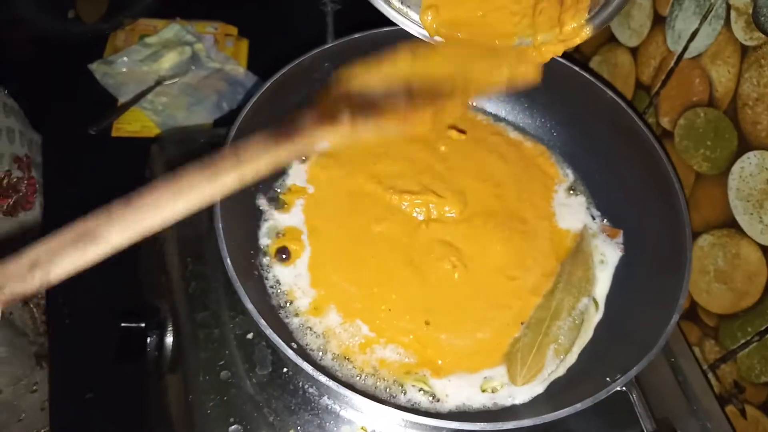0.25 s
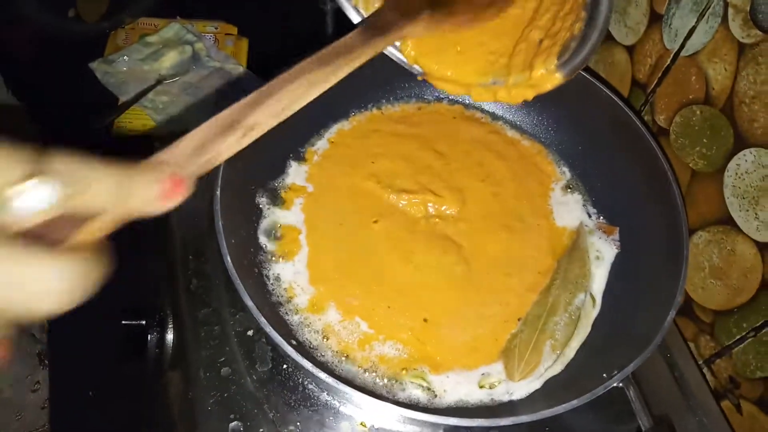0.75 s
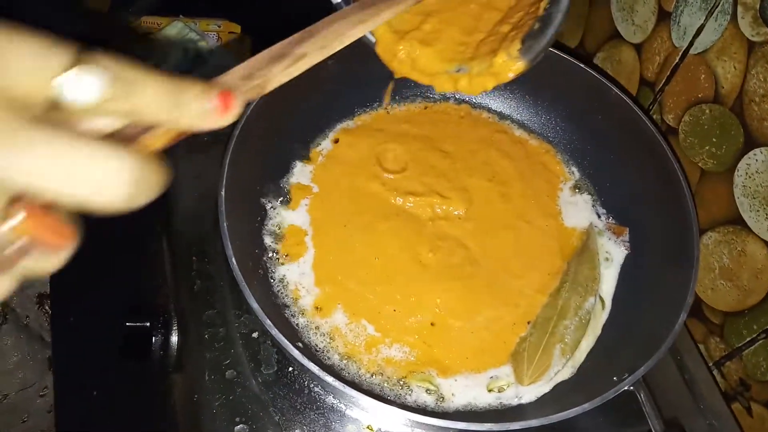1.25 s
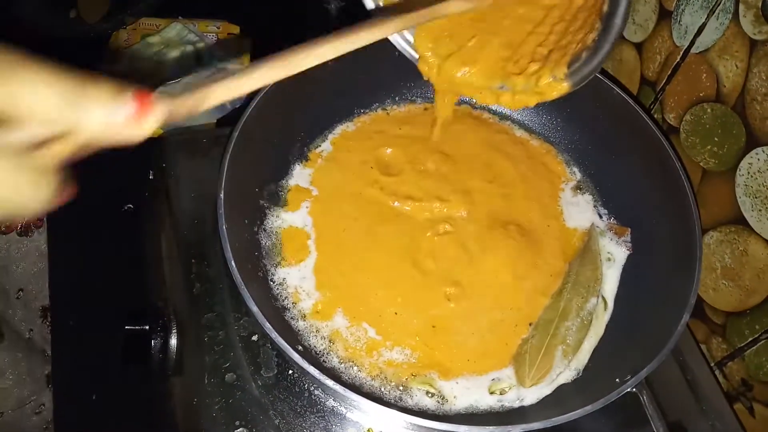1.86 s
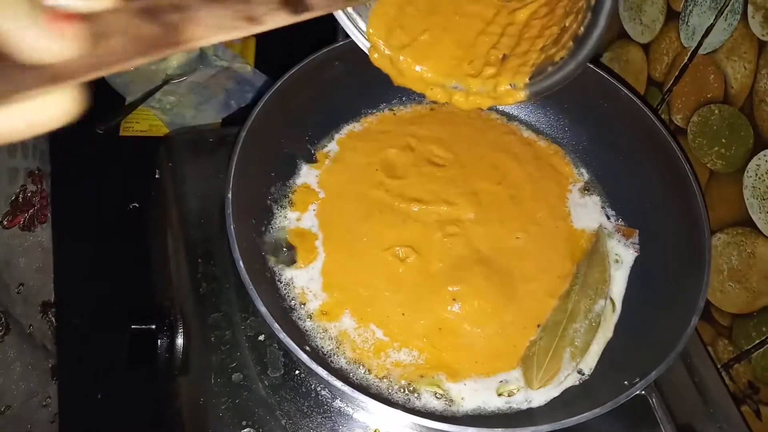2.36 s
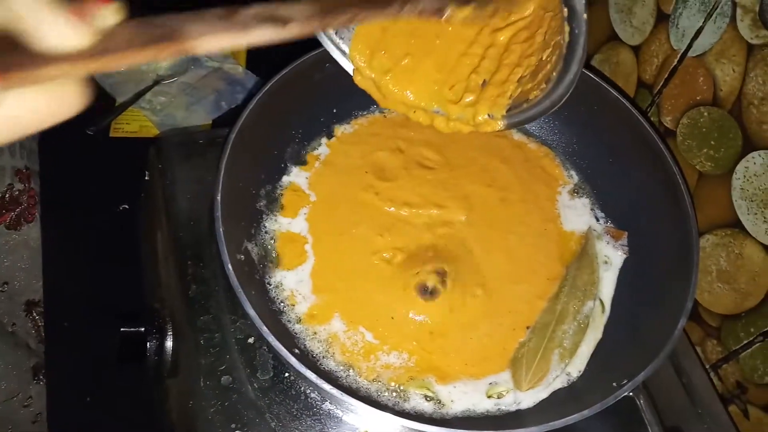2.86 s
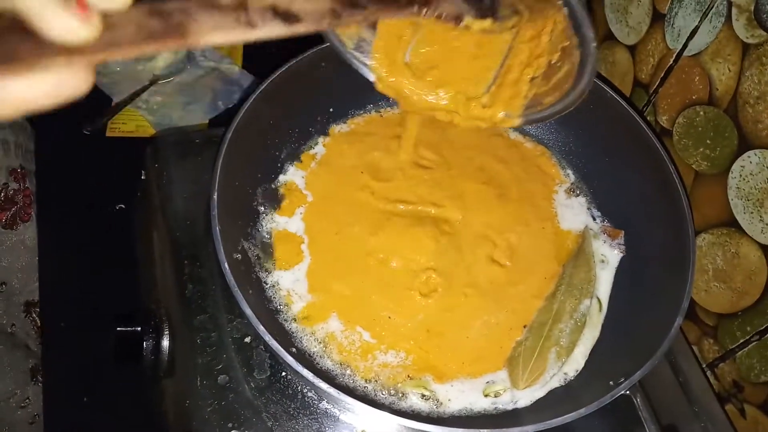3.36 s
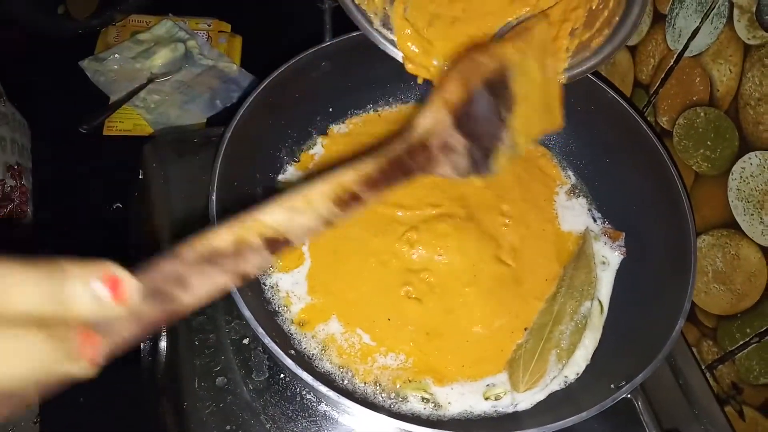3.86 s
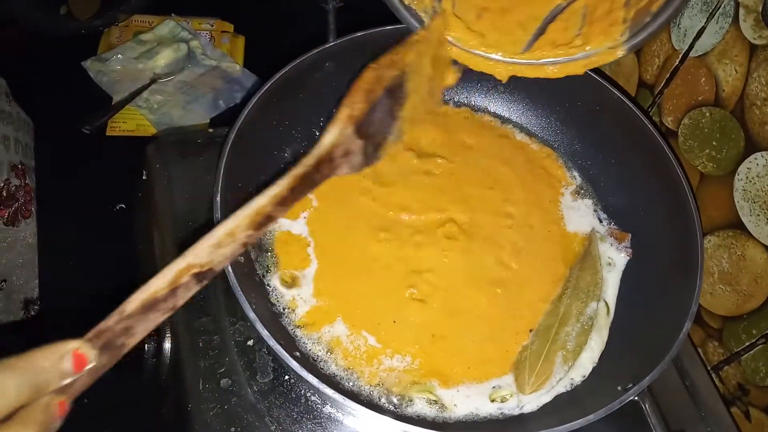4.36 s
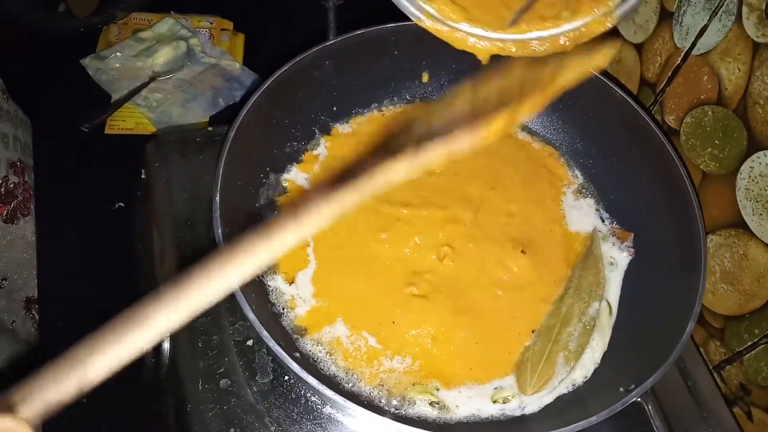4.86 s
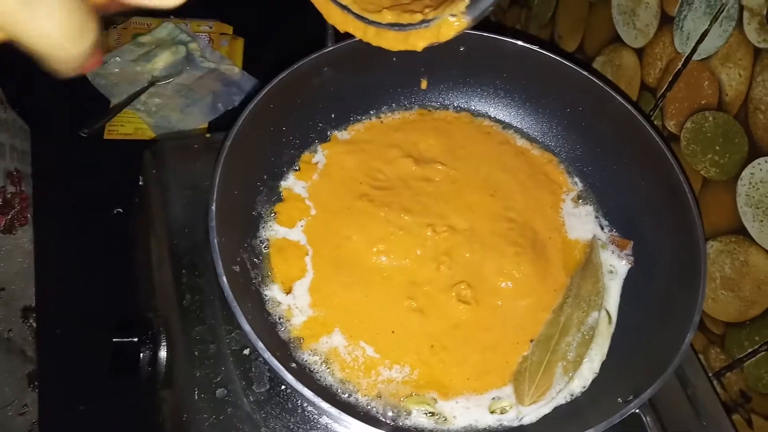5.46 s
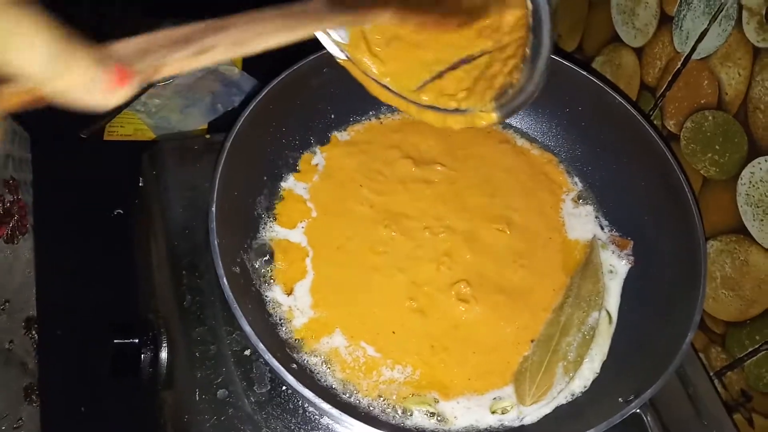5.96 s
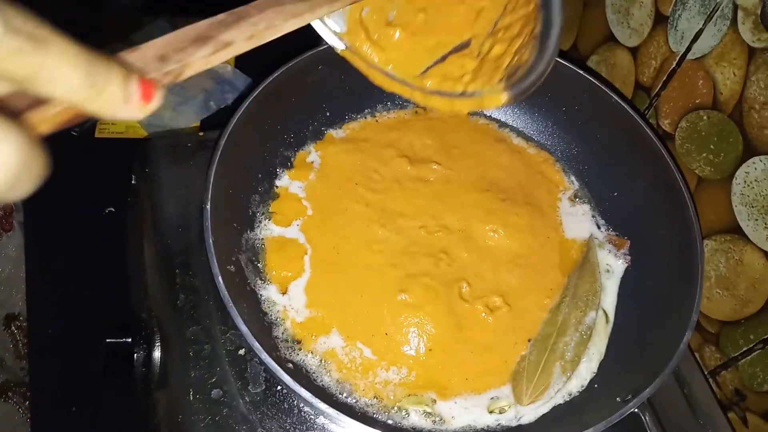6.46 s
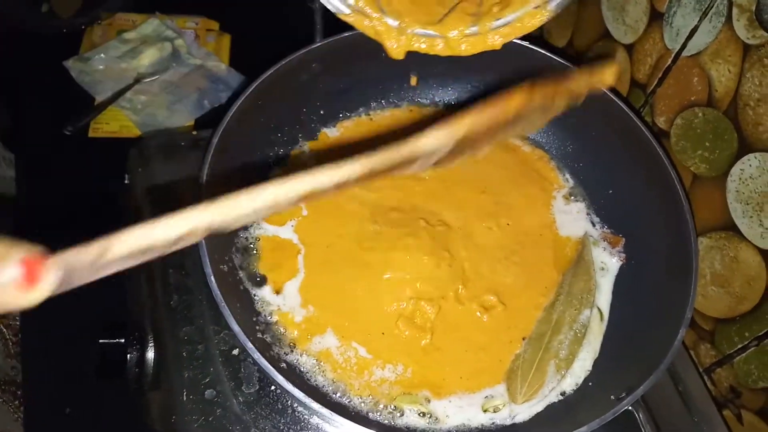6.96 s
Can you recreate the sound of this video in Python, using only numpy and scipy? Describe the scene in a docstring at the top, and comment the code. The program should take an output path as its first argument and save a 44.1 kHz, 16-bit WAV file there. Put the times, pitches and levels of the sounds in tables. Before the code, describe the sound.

Close to the pan in a small hard-walled kitchen, butter foam hisses and crackles throughout, flaring briefly. Thick paste seethes underneath with soft plops and puffs of steam, busiest around two seconds. Sharp droplets spit. A wooden spatula knocks a paste-deadened steel bowl near 0.7, 1.3, 3.9, 6.4 and 7.1 seconds, with two dull thuds between. A low hum swells occasionally and faint cricket-like chirps sound far off.

```python
"""Butter sizzles in a hot pan, close to a phone in a small kitchen: a hiss of dense impulses with pings and snaps.
Through it a thick paste seethes: gliding decaying tones make its bubbles, swept noise its puffs of steam.
A low hum of two wavering tones booms now and then; far off a train of short pulses chirps like a cricket.
Droplets spit as band-limited bursts; a wooden spatula knocks and rubs on a steel bowl deadened by paste, heard
as damped modes, with two low dull thuds. Hard walls reverberate; a scattered copy of opposite sign left and
right widens the sound."""
import sys
import numpy as np
from scipy import signal
from scipy.fft import rfft, irfft
from scipy.io import wavfile
from scipy.ndimage import uniform_filter1d

SR = 44100
rng = np.random.default_rng(int(sys.argv[2]) if len(sys.argv) > 2 else 0)


def file_out(sig):
    """Save sig as 16-bit WAV at sys.argv[1]."""
    # one column per channel
    cols = np.atleast_2d(sig).T
    # limit, then scale
    lim = np.clip(cols, -1, 1)
    pcm = np.round(lim * 32767).astype(np.int16)
    wavfile.write(sys.argv[1], SR, pcm)


N = 317520
TIME = np.arange(N) / SR


def amp(db):
    """Level law: decibels to amplitude ratio."""
    return 10 ** (np.asarray(db) / 20)


def unit(x):
    """Normalisation to an rms of 1."""
    return x / np.sqrt(np.mean(x ** 2) + 1e-18)


def peak(x, db):
    """Normalisation to a peak level in dB."""
    return x * amp(db) / (np.abs(x).max() + 1e-12)


def curves(table):
    """Linear interpolation of a timed table's columns, sample by sample."""
    times, *columns = np.transpose(table)
    return [np.interp(TIME, times, column) for column in columns]


def span(seconds):
    """Time axis [s] of a short sound."""
    return np.arange(int(seconds * SR) + 2) / SR


def fade(t, t60):
    """Exponential decay, falling by 60 dB in t60 seconds."""
    return np.exp(-np.log(1000) * t / t60)


def arch(middle_s, length):
    """Raised-cosine envelope: a smooth rise from 0 to 1 and back."""
    return np.cos(np.pi * np.clip((TIME - middle_s) / length, -.5, .5)) ** 2


def add(out, s, x):
    """Superposition: mix a short sound in at time s."""
    i = int(np.clip(s * SR, 0, N - 1))
    out[i:i + len(x)] += x[:N - i]


def band(x, lo_hz, hi_hz, order=2):
    """Causal Butterworth band-pass."""
    edges = [lo_hz, min(hi_hz, SR / 2 - 1000)]
    return signal.sosfilt(signal.butter(order, edges, "band", fs=SR, output="sos"), x)


def around(x, hz, octaves, order=2):
    """Band-pass of constant relative width, so many octaves around a pitch."""
    half = 2 ** (octaves / 2)
    return band(x, hz / half, hz * half, order=order)


def colour(x, points, size=2048):
    """Minimum-phase filter through (frequency [Hz], gain [dB]) points, so clicks stay sharp."""
    hz, db = np.transpose(points)
    bins_hz = np.arange(size + 1) * SR / size / 2
    gain_db = np.interp(np.log(bins_hz + 1), np.log(hz), db)
    # folding the cepstrum onto positive times gives the minimum phase
    cepstrum = irfft(np.log(amp(gain_db)))
    cepstrum[1:size] *= 2
    cepstrum[size + 1:] = 0
    response = irfft(np.exp(rfft(cepstrum)))
    return signal.fftconvolve(x, response)[:len(x)]


def walk(rate):
    """Smoothed random wandering with spread 1: new values at a rate per second, averaged twice."""
    k = int(SR / rate)
    steps = np.repeat(rng.standard_normal(N // k + 1), k)
    return unit(uniform_filter1d(uniform_filter1d(steps, k), k)[:N])


def clicks(rate, spread_db, cap_db):
    """Poisson-like impulses of either sign, at a rate per second: many small ones, a few large."""
    size = amp(np.minimum(spread_db * rng.exponential(size=N), cap_db))
    return (rng.random(N) < rate / SR) * size * np.sign(rng.standard_normal(N))


def patches(rate, swell_db, patch_db, smooth_db, edges):
    """Shot noise of dense tiny bursts, whose bands of pitch swell together and on their own."""
    out, swell = 0, swell_db * walk(50)
    ticks = unit(clicks(rate=rate, spread_db=2.0, cap_db=8.5)) + amp(smooth_db) * rng.standard_normal(N)
    for k, (lo, hi) in enumerate(zip(edges, edges[1:])):
        shifted = np.roll(ticks, k * N // len(edges))  # so the bands do not tick in step
        out = out + band(shifted, lo, hi, order=3) * amp(swell + patch_db * walk(60))
    return unit(out)


# butter foam frying a little harder as it heats, before the trim: (time [s], level [dB])
FOAM_HEAT = [(0.0, -45), (0.36, -46.5), (1.98, -45.5), (2.4, -43), (3.95, -44.5), (4.53, -46.5),
             (6.82, -42.5), (7.2, -42)]
# flare-ups where wet paste touches the fat: (middle time [s], rise [dB], length [s])
FLARE_UPS = [(0.657, 8.5, 0.16), (1.432, 7.5, 0.18), (1.95, 8, 0.058), (2.685, 7.5, 0.062),
             (3.473, 5.5, 0.073), (3.706, 4, 0.15), (6.104, 5, 0.048), (6.244, 3, 0.071)]


def frying(foam_db=3, unrest_db=-0.5, unrest_hz=16):
    """Level modulation of the foam [dB]: slow course of the heat, restless flutter and flare-ups."""
    (heat_db,) = curves(FOAM_HEAT)
    flares_db = sum(db * arch(s, length) for s, db, length in FLARE_UPS)
    return heat_db + foam_db + unrest_db * walk(unrest_hz) + flares_db


def pings(lo_hz=1800, hi_hz=11000, cycles=32, spread_db=4, count=1500):
    """Damped oscillation: many tiny decaying pings at random pitches and times, a speckled grain in the hiss."""
    out = np.zeros(N)
    for when, pitch, size, life in rng.random((count, 4)):
        hz = lo_hz * (hi_hz / lo_hz) ** pitch
        t60 = cycles * (.5 + life) / hz
        t = span(t60)
        level_db = min(-spread_db * np.log(size), 11)
        add(out, when * N / SR, np.sin(2 * np.pi * hz * t) * fade(t, t60) * amp(level_db))
    return unit(out)


# filter on the butter foam: (frequency [Hz], gain [dB])
FOAM_COLOUR = [(300, -17), (1000, -35.5), (2500, -2), (4000, 2), (6500, 5), (9000, 6.5), (12500, 3.5),
               (14500, 2), (16000, -56)]


def crackle(level_db, snap_db=-7, ping_db=-6, gain_db=-2.5):
    """Shot noise of butter foam: a hiss of tiny steam bursts with pings and lone snaps standing out."""
    edges = [1500, 4000, 6000, 8500, 11500, 17000]
    hiss = patches(rate=2400, swell_db=1.9, patch_db=1.7, smooth_db=-8, edges=edges)
    snaps = band(unit(clicks(rate=340, spread_db=5, cap_db=19)), 4000, 12000, order=1)
    foam = hiss + amp(snap_db) * snaps + amp(ping_db) * pings()
    return unit(colour(foam, FOAM_COLOUR)) * amp(level_db + gain_db)


# start level, steady fall and depth of the dips, before the trims in paste()
SEETHING_DB, FALL_DB_PER_S, DIP_DB = -47, 0.23, -9
# brief dips in the level of the seething noise: (middle time [s], length [s])
SEETHING_DIPS = [(0.239, 0.03), (1.254, 0.037), (1.79, 0.17), (2.85, 0.051), (3.22, 0.13), (4.137, 0.072),
                 (4.664, 0.14), (5.19, 0.062), (5.443, 0.075), (5.78, 0.2), (6.15, 0.12), (6.627, 0.076)]


def seething():
    """Level modulation of the seething noise [dB]: a slow steady fall with brief dips."""
    dips = sum(arch(s, length) for s, length in SEETHING_DIPS)
    return SEETHING_DB - FALL_DB_PER_S * TIME + DIP_DB * dips


def bubble(hz, t60, rise=.066, skin_db=-7, attack_s=.0002, wobble=.028):
    """Cavity resonance: the soft cavity wobbles and rises in pitch as it opens, while its wet skin tears."""
    t = span(t60)
    flutter = wobble * unit(band(rng.standard_normal(len(t)), 40, 200, order=1))
    pitch_hz = hz * (1 + rise * t / t60 + flutter)
    ring = np.sin(2 * np.pi * np.cumsum(pitch_hz) / SR)
    tear = unit(band(rng.standard_normal(len(t)), hz * 0.37, hz * 1.42))
    return (ring + amp(skin_db) * tear) * fade(t, t60) * (1 - np.exp(-t / attack_s))


def puff(length, first_hz, last_hz, width_hz=330):
    """Noise on a swept carrier: a short puff of steam whose pitch slides."""
    t = span(length)
    sweep = np.cos(2 * np.pi * np.cumsum(np.geomspace(first_hz, last_hz, len(t))) / SR)
    # multiplying low noise by the sweep moves it to either side of the sliding pitch
    hiss = band(rng.standard_normal(len(t)), 60, width_hz, order=2) * sweep
    return unit(hiss * signal.windows.tukey(len(t), .5))


# large bubbles bursting in the paste: (time [s], peak level before the trim [dB], pitch [Hz], t60 [s])
LARGE_BUBBLES = [(.072, -34, 1330, 0.016), (.468, -42, 1080, 0.022), (0.923, -31, 1480, 0.013),
                 (1.217, -34, 545, 0.067), (1.25, -36, 594, 0.085), (1.59, -36, 1330, 0.022),
                 (1.697, -38.5, 1000, 0.028), (1.942, -27, 1730, 0.043), (1.956, -36.5, 691, 0.13),
                 (2.047, -30, 571, 0.13), (2.049, -34, 1810, 0.036), (2.098, -33.5, 584, 0.094),
                 (2.121, -33, 1270, 0.028), (2.137, -32, 1110, 0.031), (2.214, -34, 2080, 0.066),
                 (2.321, -26, 1780, 0.06), (2.595, -34, 1110, 0.032), (2.607, -31.5, 660, 0.074),
                 (2.625, -33, 1140, 0.045), (2.771, -32.5, 2390, 0.038), (2.872, -35.5, 1470, 0.036),
                 (3.104, -34.5, 990, 0.031), (3.171, -34.5, 940, 0.026), (3.279, -39.5, 342, 0.036),
                 (3.415, -33, 993, 0.043), (3.796, -40, 1270, 0.023), (4.095, -40, 1220, .025),
                 (4.189, -35.5, 1065, 0.03), (4.241, -33, 1200, 0.038), (4.292, -31, 910, 0.024),
                 (4.487, -35.5, 1080, 0.02), (4.851, -40, 1060, 0.035), (5.060, -33.5, 1030, 0.02),
                 (5.105, -37, 770, 0.12), (5.585, -26.5, 1040, 0.021), (5.898, -36, 1060, 0.033),
                 (6.118, -39, 444, 0.082), (6.186, -34.5, 1300, 0.02), (6.552, -32, 1080, 0.021),
                 (6.680, -32, 920, 0.052)]
# short puffs of steam whose pitch slides, mostly upward:
# (time [s], rms level [dB], length [s], first pitch [Hz], last pitch [Hz])
STEAM_PUFFS = [(1.945, -45, 0.027, 2170, 1384), (2.444, -46, 0.044, 1145, 3530),
               (3.275, -48.5, 0.028, 1005, 2100), (3.424, -51, 0.02, 1500, 2650),
               (4.288, -47, 0.056, 1041, 3050), (4.846, -52, 0.039, 1167, 2050),
               (6.27, -46.5, 0.0233, 1430, 2520), (6.51, -50, 0.054, 1480, 2190),
               (6.705, -46.5, 0.04, 892, 1470), (7.027, -44.5, 0.0285, 1009, 2000)]
# filter on the seething bed: (frequency [Hz], gain [dB])
SEETHING_COLOUR = [(150, -8.5), (300, -2), (600, -2.5), (1100, -3.5), (2000, -4), (3200, -6), (6000, -11),
                   (12000, -44)]


def paste(level_db, plop_db=1.0, puff_db=0, small_db=0, pop_db=-13, spread_db=3.0, bed_db=-0.5, count=150):
    """Superposed bursts: large plops and puffs, small bubbles, dry pops of their skins, and a seething bed."""
    out, small = np.zeros(N), np.zeros(N)
    for s, db, hz, t60 in LARGE_BUBBLES:
        add(out, s, peak(bubble(hz, t60, skin_db=-9), db + plop_db))
    for s, db, length, first_hz, last_hz in STEAM_PUFFS:
        add(out, s, puff(length, first_hz, last_hz) * amp(db + puff_db))
    for k, (late, pitch, size, life) in enumerate(rng.random((count, 4))):
        s = (k + 2 * late) / count * N / SR
        hz = 750 * 5.5 ** pitch
        db = min(-spread_db * np.log(size), 6)
        add(small, s, peak(bubble(hz, (8 + 40 * life) / hz), small_db + db))
    for hz in 1300, 2500, 4400:
        small += amp(pop_db) * unit(around(clicks(rate=55, spread_db=5, cap_db=13), hz, 1))
    edges = [150, 500, 850, 1300, 1900, 2700, 3800, 7000]
    bed = patches(rate=600, swell_db=3.3, patch_db=2.3, smooth_db=-8, edges=edges)
    bed = unit(colour(bed, SEETHING_COLOUR)) * amp(bed_db)
    return out + (small + bed) * amp(level_db)


def tone(hz, waver_hz):
    """Frequency modulation: a sine of rms 1 whose pitch wanders at random."""
    return np.sqrt(2) * np.sin(2 * np.pi * np.cumsum(hz + waver_hz * walk(24.04)) / SR)


# two low tones of the room, before the trims: (time [s], lower level [dB], upper level [dB])
HUM_LEVELS = [(0.0, -58, -72), (1.28, -47.5, -49), (1.72, -58, -58), (2.83, -48, -55.5), (3.19, -54, -55),
              (3.53, -49.5, -64), (3.79, -51.5, -59.5), (7.2, -63, -83)]
# moments when the hum booms: (middle time [s], rms level at the top [dB], length [s], pitch [Hz])
HUM_BOOMS = [(0.598, -35.5, 0.18, 96), (0.737, -45, 0.24, 131), (1.814, -42.5, 0.33, 129.1),
             (2.694, -45.5, 0.93, 98.2), (2.89, -38, 0.18, 98.9), (3.036, -47, 0.1, 138.3),
             (3.665, -42, 0.12, 100.7)]
# filter on the noise of the dull rumble: (frequency [Hz], gain [dB])
RUMBLE_COLOUR = [(20, -4), (35, -17), (60, 0), (100, 1), (170, 2.5), (230, -13), (290, -7), (400, -10.5),
                 (700, -24.5), (2000, -28.5)]


def hum(lower_hz=99.2, upper_hz=130, waver_hz=3.35, flutter_db=3.5, lower_db=1.5, upper_db=2,
        rumble_db=-52.5, boom_db=0):
    """Modulated tones: two low ones waver in pitch and level over filtered noise and boom now and then."""
    out = unit(colour(rng.standard_normal(N), RUMBLE_COLOUR)) * amp(rumble_db)
    for hz, db, trim_db in zip((lower_hz, upper_hz), curves(HUM_LEVELS), (lower_db, upper_db)):
        out += tone(hz, waver_hz) * amp(db + trim_db + flutter_db * walk(21.72))
    for s, db, length, hz in HUM_BOOMS:
        out += tone(hz, waver_hz) * arch(s, length) * amp(db + boom_db)
    return out


# faint chirps: (start time [s], level before the gain [dB])
FAR_CHIRPS = [(0.191, -46), (1.35, -44.5), (2.78, -45), (4.441, -46), (5.519, -45.5), (7.121, -44.5)]


def chirps(length=.15, centre_hz=5230, spread_hz=330, pulse_s=0.0081, gain_db=-5, count=50):
    """Pulse train in a diffuse field: a soft far rasp of quick uneven pulses, blurred by the walls."""
    out, t = np.zeros(N), span(pulse_s)
    for s, db in FAR_CHIRPS:
        for k, (late, pitch, size) in enumerate(rng.standard_normal((count, 3))):
            along = (k + .5) / count
            hz = centre_hz + spread_hz * pitch
            pulse = np.sin(2 * np.pi * hz * t) * signal.windows.hann(len(t))
            swell = np.sin(np.pi * along) ** .5
            pulse *= 2 * np.sign(size) * swell * amp(db + gain_db)
            add(out, s + (along + late / count) * length, pulse)
    t = span(.2)
    walls = rng.standard_normal(len(t)) * fade(t, .08)
    return out + .5 * signal.fftconvolve(out, walls / np.linalg.norm(walls))[:N]


# spitting butter:
# (time [s], peak level before the gain [dB], centre frequency [Hz], decay time constant of the spray [s])
BUTTER_SPITS = [(0.335, -27.5, 5330, 0.002), (0.5585, -28, 5800, 0.0015), (.575, -26.5, 7150, 0.0024),
                (0.877, -30.5, 4550, 0.0051), (1.722, -35, 8240, 0.055), (1.951, -33, 10400, 0.0033),
                (2.669, -25, 10000, 0.002), (2.679, -26, 10100, 0.0025), (2.7407, -26.5, 8300, 0.0014),
                (2.7715, -24, 5960, 0.0012), (2.781, -30, 10000, .004), (2.877, -26.5, 8260, 0.0023),
                (3.0893, -25, 9500, 0.0014), (3.2364, -30, 8000, .001), (3.2704, -28.5, 8500, .001),
                (3.3137, -30, 8000, .001), (4.242, -28, 9000, 0.01), (4.335, -27, 6860, 0.0022),
                (4.3755, -20.5, 8400, 0.0016), (4.399, -32, 7500, .003), (4.9867, -24.5, 9500, 0.0018),
                (5.281, -31.5, 9000, 0.0067), (5.871, -26.5, 8050, 0.0015), (5.944, -29, 10900, 0.0042),
                (6.0222, -24.5, 8900, 0.0011), (6.0726, -25, 8050, .0015), (6.1688, -24, 7300, 0.0014),
                (6.2018, -31, 6300, .0015), (6.403, -30, 4270, 0.011), (6.4748, -24, 7400, 0.0013),
                (6.967, -29.5, 7700, 0.003)]


def spits(gain_db=3, spray_db=-1, snap_db=1):
    """Impulsive vaporisation: a droplet of water bursts in the fat, one sharp snap, then a short spray."""
    out = np.zeros(N)
    for s, db, hz, length in BUTTER_SPITS:
        t = span(0.11)
        burst = amp(spray_db) * np.sign(rng.standard_normal(len(t))) * np.exp(-t / length)
        burst[0] += amp(snap_db)
        add(out, s, peak(band(burst, hz * 0.65, hz * 1.45), db + gain_db))
    return out


# modes of the bowl with the spatula against it: (frequency [Hz], level [dB], t60 [s])
BOWL_MODES = [(238, -8, .15), (290.2, -1.5, 0.98), (378, 5, 0.29), (477, 2, 0.22), (518.7, -3, 0.075),
              (578, 4, 0.37), (686, 9.5, 0.18), (707, 0.5, 0.29), (888, 10.5, 0.19), (947, 4.5, .13),
              (1005, -2.5, 0.12), (1050, 6.5, 0.14), (1146, 2, 0.12), (1405, -9, .12), (1480, 3, 0.099),
              (1660, 0.5, 0.18), (1790, 1.5, 0.15), (1910, 12.5, 0.16), (1984, -11, 0.11),
              (2066, 6.5, 0.094), (2160, 2, 0.1), (2330, 4, .16), (2480, 1, 0.11), (2640, -1, 0.2),
              (2850, -1, 0.11), (3170, 1, 0.13), (3460, 7, 0.13), (3690, 8, 0.06), (3780, -7, 0.15),
              (3950, -16, 0.044), (3910, 6, 0.077), (4610, 0.5, 0.063), (4990, 4, .035),
              (6450, -5.5, 0.092)]


def bowl(t, lo, hi, spot_hz=0, pressed_t60=0.07, pressed_db=11, spot_db=5, spot_width=0.056):
    """Modal superposition within a range of pitch, loudest at the spot's pitch; wood and paste damp most of it."""
    ring = 0
    for hz, db, t60 in BOWL_MODES:
        if lo <= hz < hi:
            favour_db = spot_db * np.exp(-((hz - spot_hz) / (spot_width * hz)) ** 2)
            ring = ring + amp(db + favour_db) * np.sin(2 * np.pi * hz * t) * fade(t, t60)
    return band(ring * (1 + amp(pressed_db) * fade(t, pressed_t60)), lo, hi, order=2)


# knocks, and two low dull thuds, on the bowl or in the paste; each spot strikes the families of modes differently:
# (time [s], pitch of the spot [Hz], t60 of the damped part [s], base [dB], hollow [dB], wall [dB],
#  clack [dB], clank [dB], ring [dB], rim [dB], tick [dB], snap [dB])
KNOCKS_AND_THUDS = [(0.6561, 873, 0.1, -45, -31.5, -30.5, -34.5, -35.0, -32.5, -35, -32.5, -41),
                    (1.3021, 717, 0.081, -37, -27, -43.0, -55, -40.5, -51, -40.5, -44, -40.5),
                    (3.858, 945, 0.041, -38.5, -27.0, -25.5, -36.5, -42, -59, -52, -47.5, -53),
                    (5.256, 373, 0.09, -41, -47, -42, -51, -57, -58, -54.5, -48, -52),
                    (6.1003, 403, 0.064, -43.5, -58, -51, -48.0, -52, -56.5, -50, -54, -56),
                    (6.4057, 1470, 0.061, -60, -46.5, -43, -45, -36.5, -45, -40.5, -37, -38.5),
                    (7.0589, 2340, 0.037, -46.5, -31.5, -35, -54, -42, -30, -41, -30.5, -36)]
# edges of the nine families of modes, from base to snap: (frequency [Hz])
FAMILY_EDGES = [240, 520, 790, 1300, 1700, 1950, 2350, 3000, 4100, 8000]
# spatula rubbing along the bowl: (time [s], low groan level [dB], high rasp level [dB], length [s])
BOWL_SCRAPES = [(0.624, -44, -42, 0.014), (0.645, -38, -31, 0.011), (2.588, -49, -50.5, 0.042),
                (5.273, -51.5, -50.5, 0.048), (6.394, -59, -42, 0.018), (6.406, -51, -48, 0.035),
                (7.162, -45.5, -49.5, 0.018), (7.187, -41, -39, 0.025)]


def spatula(chatter_db=-6, chatter_t60=0.11, soak_db=-7, crack_db=-8.0, crack_db_per_octave=3.0,
            knock_db=0, scrape_db=0):
    """Impact and friction excitation of modes: knocks with a crack and chatter, two dull thuds, and rubbing."""
    out, t = np.zeros(N), span(.4)
    for s, spot_hz, pressed_t60, *levels in KNOCKS_AND_THUDS:
        chatter = rng.standard_normal(len(t)) * fade(t, chatter_t60)
        chatter *= amp(chatter_db) / np.linalg.norm(chatter)
        strike = signal.unit_impulse(len(t))
        push = strike + amp(soak_db) * chatter  # little of the chatter sets the modes ringing
        for db, lo, hi in zip(levels, FAMILY_EDGES, FAMILY_EDGES[1:]):
            # the higher the family, the more its crowded modes merge into a dry crack
            octaves_up = np.log2(lo / FAMILY_EDGES[1])
            crack_gain = amp(crack_db + crack_db_per_octave * octaves_up)
            crack = crack_gain * unit(band(strike + chatter, lo, hi))
            ring = signal.fftconvolve(push, bowl(t, lo, hi, spot_hz, pressed_t60))[:len(t)]
            blow = unit(ring) + crack
            add(out, s, blow / blow[t < .02].std() * amp(db + knock_db))  # level over the first 20 ms
    for s, groan_db, rasp_db, length in BOWL_SCRAPES:
        for db, lo, hi in (groan_db, 620, 950), (rasp_db, 1400, 2350):
            friction = rng.standard_normal(len(t)) * (t < length)
            rub = signal.fftconvolve(friction, bowl(t, lo, hi))[:len(t)]
            add(out, s, rub / rub[t < length].std() * amp(db + scrape_db))
    return out


def kitchen(x, wet_db, low_t60=0.43, high_t60=0.31):
    """Reverberation: direct sound plus the short decaying ring of hard walls."""
    t = span(.5)
    noise = rng.standard_normal(len(t))
    low = band(noise, 173, 2380) * fade(t, low_t60)
    high = amp(-44) * band(noise, 3350, 10700) * fade(t, high_t60)
    tail = (low + high) * (t > .004)  # the walls answer after 4 ms
    tail /= np.sqrt(np.sum(fade(t, low_t60) ** 2))
    return x + amp(wet_db) * signal.fftconvolve(x, tail)[:N]


# filter on the side signal: (frequency [Hz], side relative to mid [dB])
SIDE_COLOUR = [(60, -14), (110, -21), (200, -14), (380, -16.5), (700, -16.5), (1290, -16.5), (2380, -17.5),
               (4400, -12.5), (8120, -10.5), (15000, -10)]


def stereo(x, scatter_t60=0.046, drift=2.5):
    """Decorrelation: a scattered copy with randomly drifting phase [rad] is added left and subtracted right."""
    t = span(.08)
    scatter = rng.standard_normal(len(t)) * fade(t, scatter_t60)
    copy = signal.fftconvolve(x, signal.hilbert(scatter) / np.linalg.norm(scatter))[:N]
    turned = np.real(copy * np.exp(1j * drift * walk(30)))
    side = colour(turned, SIDE_COLOUR)
    return np.array([x + side, x - side])


def scene():
    """Superposition of sources: the pan right under the phone, the bowl above its far rim, the room behind."""
    pan = kitchen(crackle(frying()) + paste(seething()), wet_db=-5.0)
    # the spitting droplets are nearest, so driest
    rim = kitchen(spits(), wet_db=-14)
    knocking = kitchen(spatula(), wet_db=-4.5)
    return stereo(pan + rim + knocking + chirps() + hum())


def record(dry):
    """Band limitation: the phone cuts the top with a steep elliptic low-pass at 15.6 kHz."""
    return signal.sosfilt(signal.ellip(8, .2, 70, 15600, fs=SR, output="sos"), dry)


dry = scene()
out = record(dry)
file_out(out)
```